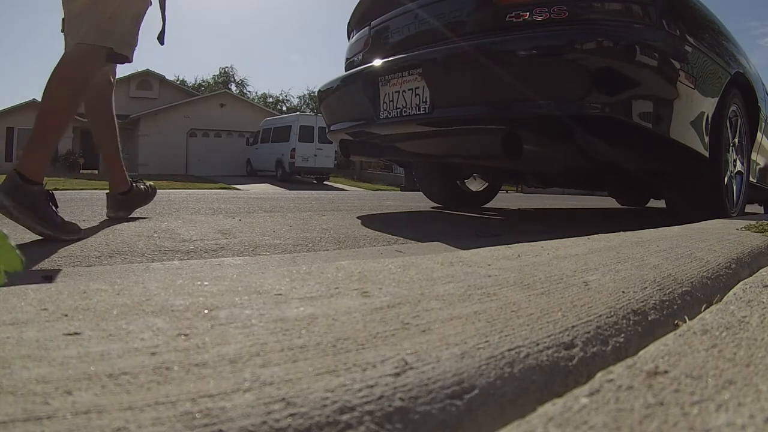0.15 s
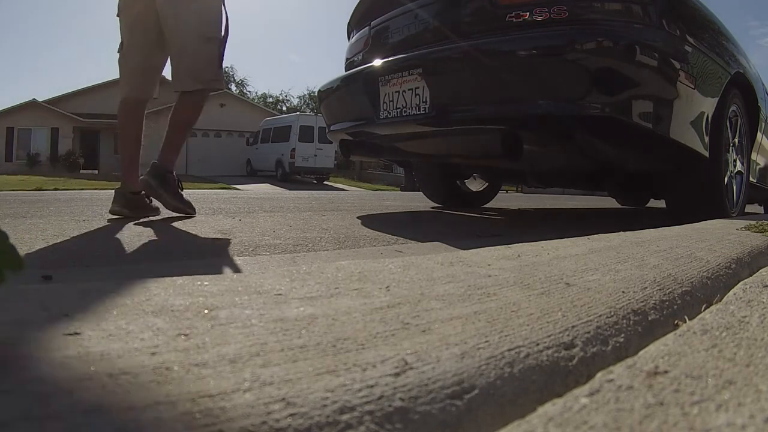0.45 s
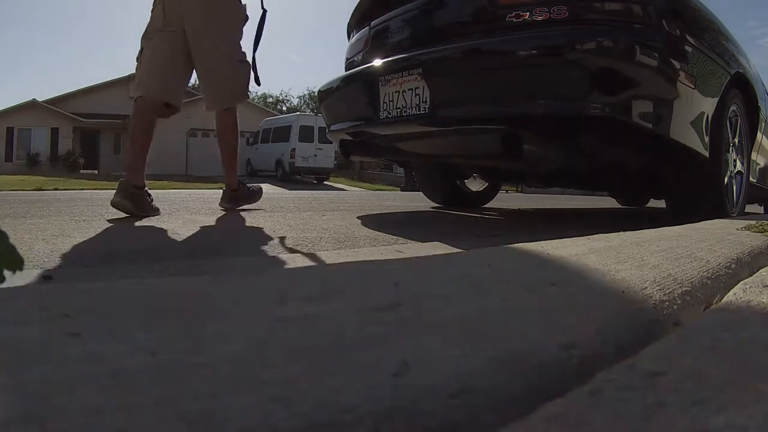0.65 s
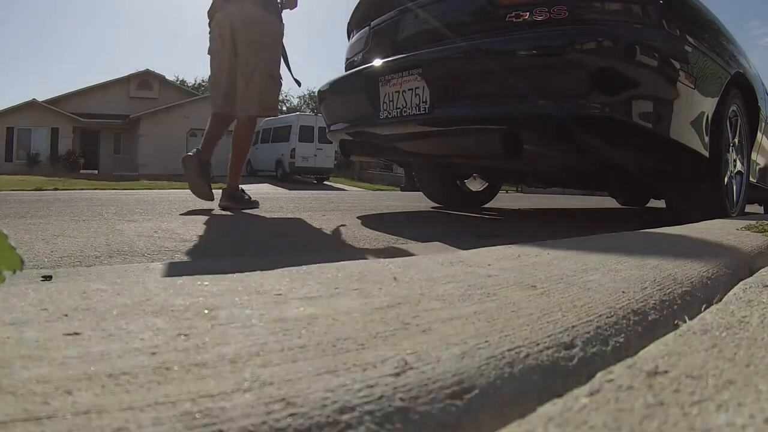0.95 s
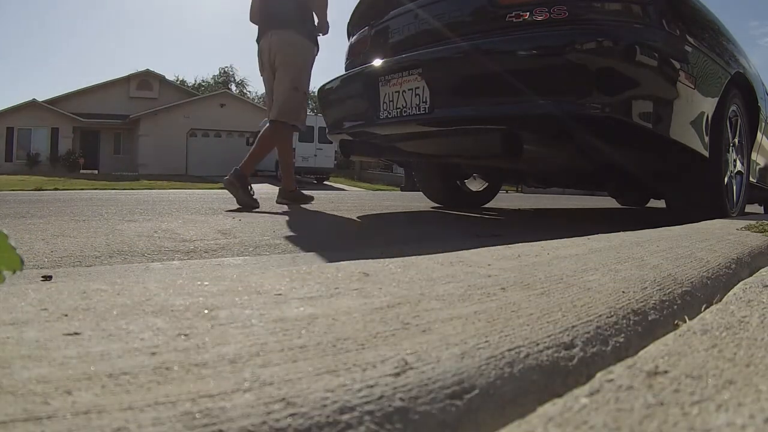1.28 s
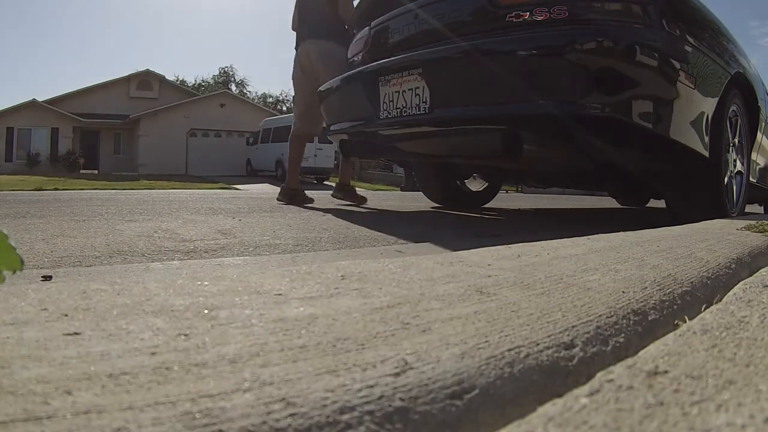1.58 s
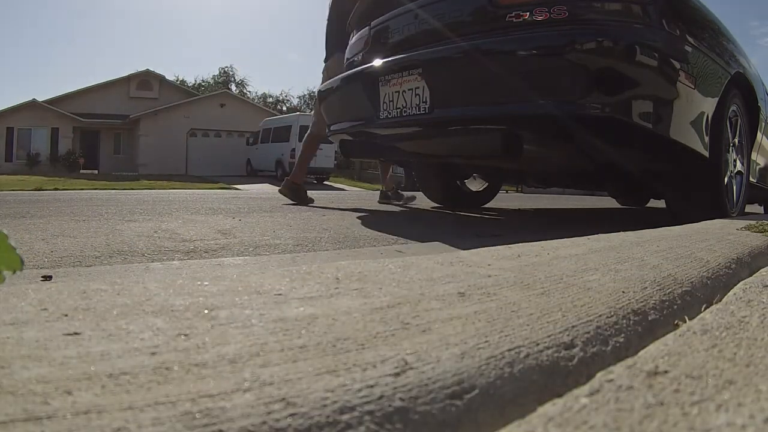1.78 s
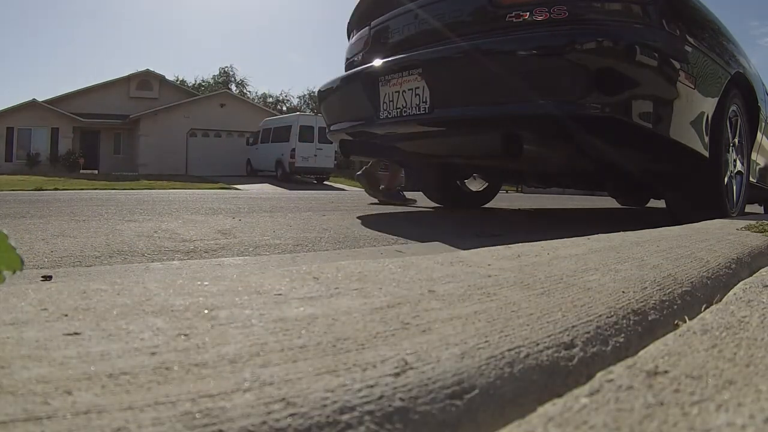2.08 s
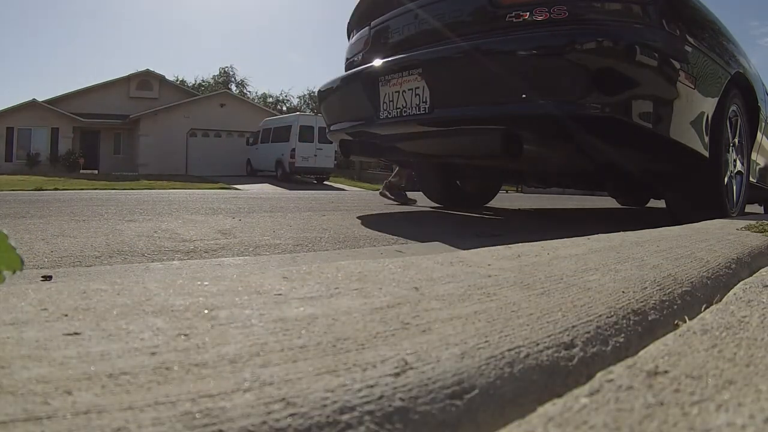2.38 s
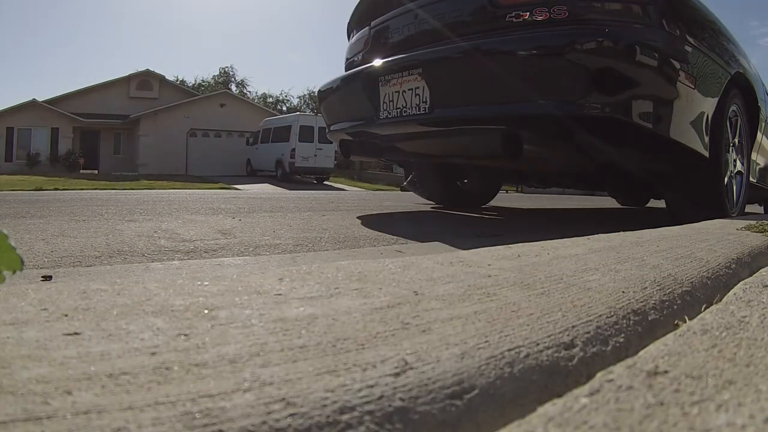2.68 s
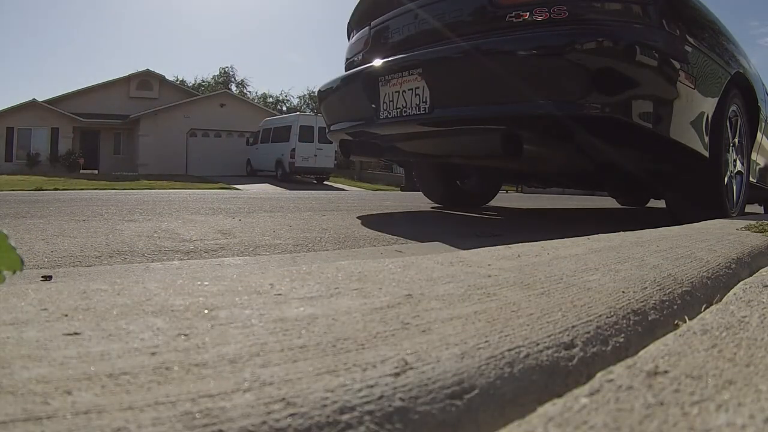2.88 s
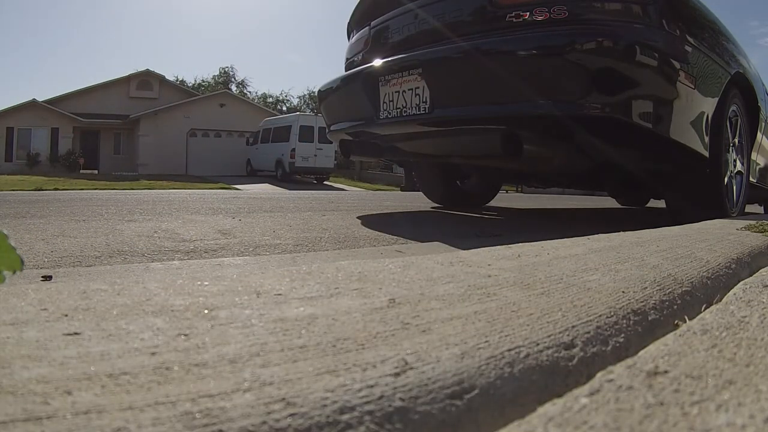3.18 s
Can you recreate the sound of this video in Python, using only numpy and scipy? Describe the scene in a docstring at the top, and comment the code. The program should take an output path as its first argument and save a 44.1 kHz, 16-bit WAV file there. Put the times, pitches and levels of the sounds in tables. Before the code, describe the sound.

Light footsteps in trainers scuff and crackle on a gritty driveway, fading away from a microphone on the ground. A faint bird chirps over a low hum and soft suburban hiss. At the end, a car door clicks and thumps.

```python
"""A suburban driveway, one microphone lying on the ground. Someone in trainers walks off
towards a parked car, soles scuffing and cracking grains of sand. Far off, a small bird repeats
a falling chirp over a machine hum and the soft hiss of the suburb. At the end come light taps,
a latch click and a dull thump, most likely the car's door."""
import sys
import numpy as np
from scipy import signal
from scipy.fft import rfft, irfft
from scipy.io import wavfile

SR = 44100
rng = np.random.default_rng(int(sys.argv[2]) if len(sys.argv) > 2 else 0)


def unload_wav(signal):
    """Save mono or channel-first audio to the path in sys.argv[1] as 16-bit WAV at rate SR, clipped to [-1, 1]."""
    wavfile.write(
        sys.argv[1],
        SR,
        np.round(np.clip(np.atleast_2d(signal).T, -1, 1) * 32767).astype(np.int16),
    )


N = 147294
T = np.arange(N) / SR

# Soles dragging over the driveway: centre_s, width_s, level_db, tilt_db_per_octave
SCUFFS = [(0.01, 0.041, -66, -2.5), (0.22, 0.011, -57.5, 1), (0.269, 0.01, -58, .5),
          (0.307, .03, -68.5, 2.5), (.515, 0.0084, -70, 8), (0.742, 0.0093, -62, -3),
          (0.763, 0.0041, -54.5, -3), (0.789, 0.027, -64, -1.5), (1.334, 0.029, -64, -2),
          (1.87, 0.028, -69, -5), (2.165, .03, -73, 12), (2.528, 0.067, -72.5, -3)]
# Spectrum of the grit: frequency_hz, density_db
GRIT_SPECTRUM = [(700, -23), (1500, 3), (2500, 4.5), (4200, 3.5), (6200, 3.5), (7500, -1.5), (10000, -2.5),
                 (15000, -11)]
def scuffs(grains_per_s=3400, spread_db=4.1):
    """A dragging sole sets off a shower of tiny clicks of uneven size."""
    out = np.zeros(N)
    for s, width_s, db, tilt_db in SCUFFS:
        sizes = from_db(spread_db * np.minimum(rng.exponential(1, N), 4))
        signs = rng.choice([-1, 1], N)
        grains = sizes * signs * (rng.random(N) < grains_per_s / SR)
        out += from_db(db) * swell(s, width_s) * coloured(grains, GRIT_SPECTRUM, tilt_db)
    return out


# Single grains breaking underfoot: start_s, level_db, pitch_hz
CRACKS = [(.0035, -44.5, 7000), (.019, -34.5, 2330), (0.0414, -45, 2400), (.051, -39.5, 2150),
          (0.129, -46, 6500), (0.2206, -37, 6000), (.2632, -41, 6000), (0.277, -34, 5570),
          (.302, -42, 9500), (.334, -42.5, 3000), (.3915, -45.5, 6200), (.7602, -44, 2700),
          (0.765, -39, 2900), (0.7827, -36, 4830), (.7895, -44, 9000), (.810, -40, 6800),
          (1.333, -42, 5000)]
def sand_cracks(ring_cycles=4.4, snap_db=-8.5):
    """Each grain cracks with a bright snap and rings for a few cycles."""
    return sum(from_db(db) * (ring(click(s), hz, ring_cycles / hz) + from_db(snap_db) * click(s))
               for s, db, hz in CRACKS)


# Heels landing: start_s, level_db
HEEL_STRIKES = [(.0365, -46), (0.601, -63), (.973, -43), (1.198, -47), (1.279, -51)]
# Resonances of a heel on the ground: pitch_hz, gain_db, t60_s
HEEL_MODES = [(505, -2.5, 0.028), (630, -7.5, 0.024), (1210, -20, 0.0089)]
def heels():
    """Each heel lands with a soft, quickly damped tap."""
    return struck(HEEL_STRIKES, HEEL_MODES)


def leg_puff():
    """The passing leg pushes air against the microphone."""
    return from_db(-44) * swell(s=.182, width_s=.013) * tone(hz=31.2)


# Knocks of the car door: start_s, level_db, lowpass_hz, rattle_db, rattle_t60_s
DOOR_KNOCKS = [(3.2195, -55.5, 3200, 11.5, 0.11), (3.2425, -34, 1090, -2, .13), (3.256, -42, 700, 0, .13),
               (3.266, -42.5, 900, -4, 0.12), (3.279, -39.5, 190, 0, .14), (3.288, -38, 190, 0, 0.16),
               (3.318, -48.5, 1000, 2, .16)]
# Resonances of its panel: pitch_hz, gain_db, t60_s
PANEL_MODES = [(60, 0, 0.21), (86.2, -2.5, 0.27), (144, -3, 0.28), (171, -0.5, 0.28), (206, 1.5, 0.33),
               (313, 2, 0.25), (404, 1, 0.16), (504, -8.5, 0.22), (638, -4.5, 0.17), (700, -2, 0.14),
               (755, -1.5, 0.27), (858, -7, 0.22), (1060, -5.5, 0.11), (1350, -12.5, 0.059)]
# Spectrum of its fittings: frequency_hz, density_db
RATTLE_SPECTRUM = [(60, 2), (150, 4.5), (300, 2), (750, 1.5), (1000, -10), (2400, -12.5), (3200, -21),
                   (4400, -18), (5500, -23), (12000, -42)]
def door_thump(panel_db=-6.5, detune=.025):
    """Each knock rings the panel at slightly shifted pitches and shakes the fittings."""
    out = np.zeros(N)
    for s, db, lowpass_hz, rattle_db, rattle_t60 in DOOR_KNOCKS:
        panel = np.zeros(N)
        for hz, mode_db, t60 in PANEL_MODES:
            gain = rng.choice([-1, 1]) * from_db(mode_db + rng.normal(0, .95))
            panel += gain * ring(click(s), hz * rng.normal(1, detune), t60)
        rattle = from_db(rattle_db) * burst(s, RATTLE_SPECTRUM, rattle_t60)
        out += from_db(db) * soften(from_db(panel_db) * panel + rattle, lowpass_hz)
    return out


# Swells within the thump: centre_s, width_s, level_db, pitch_hz
DOOR_SWELLS = [(3.245, .005, -35, 310), (3.25, .012, -44, 58), (3.333, .012, -47, 55),
               (3.329, .011, -54, 850)]
def door_flex():
    """The door flexes and its seal and hinge rub, in short swells of tone."""
    return sum(from_db(db) * swell(s, width_s) * tone(hz) for s, width_s, db, hz in DOOR_SWELLS)


# Blows on the latch: start_s, level_db
LATCH_STRIKES = [(3.2205, -62), (3.2465, -53.5), (3.258, -62.5)]
# Resonances of the latch: pitch_hz, gain_db, t60_s
LATCH_MODES = [(1410, -2, 0.087), (2035, 3.5, .09), (2440, -9, 0.035), (2900, -5.5, 0.049),
               (4170, -5.5, 0.062), (4430, -17, 0.066)]
def door_latch():
    """Struck steel rings briefly above the thump."""
    return struck(LATCH_STRIKES, LATCH_MODES)


# Light taps over at the car, probably its handle: start_s, level_db, snap_db
HANDLE_TAPS = [(3.058, -52.5, -1), (3.067, -57.5, -3), (3.161, -56.5, -9)]
# Their hollow resonances: pitch_hz, gain_db, t60_s
HANDLE_MODES = [(261, -2, .2), (427, -2, 0.33), (538, -3.5, 0.069), (695, 2, 0.053), (781, -13, 0.16)]
# Spectrum of the snap: frequency_hz, density_db
SNAP_SPECTRUM = [(400, 9), (800, -2), (1100, -6), (3000, -5), (4000, -22), (12000, -38)]
def door_handle():
    """Each tap is a short snap of noise and a hollow ring."""
    snaps = sum(from_db(db + snap_db) * burst(s, SNAP_SPECTRUM, t60=.084)
                for s, db, snap_db in HANDLE_TAPS)
    return snaps + struck([(s, db) for s, db, _ in HANDLE_TAPS], HANDLE_MODES)


# Chirps, far from the microphone: pitch_peak_s, level_db, hook_accent_db
CHIRPS = [(.203, -67.5, -3), (1.091, -67.5, -5), (2.230, -67, 2), (3.016, -66, -12)]
# One chirp's quick rise and longer fall: offset_from_peak_s, pitch_hz, gain_db
CHIRP_SHAPE = [(-.011, 3300, -8), (0, 3900, 0), (.009, 3330, -3), (.028, 3040, -2), (.046, 2830, -2),
               (.06, 2820, -12)]
# Softer notes after the chirps: start_s, length_s, start_hz, end_hz, level_db
TWEETS = [(.272, .04, 3150, 2780, -65.5), (1.163, .036, 3200, 2820, -66.5), (1.21, .032, 4080, 3900, -72.5),
          (1.278, .032, 2900, 2380, -70.5), (2.303, .04, 3150, 2750, -69.5), (2.462, .03, 3480, 3350, -75),
          (3.093, .03, 3100, 2820, -70)]
def bird(street_db=-3, street_t60_s=.36):
    """A distant bird whistles raspy chirps and tweets; the street adds a diffuse tail."""
    offset_s, hz, shape_db = np.transpose(CHIRP_SHAPE)
    song = np.zeros(N)
    for s, db, hook_db in CHIRPS:
        envelope = np.interp(T - s, offset_s, from_db(shape_db), left=0, right=0)
        gain = from_db(db + hook_db * swell(s, width_s=.007))
        song += gain * envelope * rasp(np.interp(T - s, offset_s, hz))
    for s, length_s, start_hz, end_hz, db in TWEETS:
        progress = np.clip((T - s) / length_s, 0, 1)
        song += from_db(db) * np.sin(np.pi * progress) * rasp(start_hz + (end_hz - start_hz) * progress)
    tail = rng.standard_normal(N) * from_db(-60 * T / street_t60_s)
    reverb = signal.fftconvolve(song, tail / np.linalg.norm(tail))[:N]
    return song + from_db(street_db) * reverb


def rasp(hz, flutter_hz=220, spread_hz=45, depth=.2):
    """The bird's whistle flutters quickly in pitch and loudness."""
    bend, flutter = wobble(flutter_hz), wobble(flutter_hz)
    return rms_one((1 + depth * flutter) * tone(hz + spread_hz * bend))


def ping():
    """One faint, thin, very high ping."""
    return from_db(-73) * swell(s=2.402, width_s=.005) * tone(hz=14450)


# Unevenness of the hum: time_s, depth_ratio
HUM_THROB = [(0, .3), (1.9, .25), (2.4, .08)]
def machine_hum():
    """A machine holds one low note that throbs irregularly."""
    throb = np.interp(T, *np.transpose(HUM_THROB)) * wobble(hz=12)
    return from_db(-54) * (1 + throb) * tone(hz=118.4)


# Drones just above the hum, just below it and higher up: time_s, level_db
UPPER_DRONE = [(0, -53), (.25, -54), (.42, -64), (.65, -54), (.9, -71.5), (2.0, -67), (3.3, -82)]
LOWER_DRONE = [(0, -55), (.45, -70), (.7, -55), (1.2, -66.5), (1.95, -63), (2.2, -68), (3.3, -75)]
HIGH_DRONE = [(0, -70), (.6, -63), (1.2, -67.5), (1.9, -64), (2.4, -68.5), (2.8, -76)]
def drones(wander_hz=1.5):
    """Three wavering tones swell and fade; the two nearest the hum beat against it."""
    return sum(level(points) * tone(hz + wander_hz * wobble(hz=7.4))
               for hz, points in [(128.35, UPPER_DRONE), (105.7, LOWER_DRONE), (211.2, HIGH_DRONE)])


# Ambience around the driveway: frequency_hz, density_db
AIR_SPECTRUM = [(20, -6), (45, -3), (75, 2.5), (95, -3), (140, 0), (190, -5.5), (310, -8.5), (400, -12),
                (700, -15.5), (1000, -18.5), (2000, -23.5), (4000, -28), (6300, -32), (10000, -37),
                (15000, -44)]
# Its slow drift: time_s, level_db
AIR_LEVEL = [(0, -54.5), (.4, -56), (1.5, -57), (3.3, -56.5)]
def suburb_hiss():
    """Smooth outdoor noise, strongest in the bass."""
    return level(AIR_LEVEL) * coloured(rng.standard_normal(N), AIR_SPECTRUM)


def from_db(db):
    """Decibels to gain."""
    return 10 ** (np.asarray(db) / 20)


def rms_one(x):
    """Scale to unit rms."""
    return x / np.sqrt(np.mean(x ** 2) + 1e-20)


def level(points):
    """Gain over time from (time_s, level_db) points."""
    return from_db(np.interp(T, *np.transpose(points)))


def swell(s, width_s):
    """A bell curve centred on s, with standard deviation width_s."""
    return np.exp(-.5 * ((T - s) / width_s) ** 2)


def coloured(x, spectrum, tilt_db=0):
    """Give x a spectrum, tilted per octave and falling away below its first point; rms 1."""
    hz, db = np.transpose(spectrum)
    f = np.maximum(np.fft.rfftfreq(N, 1 / SR), 1)
    gain = from_db(np.interp(np.log(f), np.log(hz), db) + tilt_db * np.log2(f))
    low_cut = np.minimum(f / hz[0], 1) ** 2
    return rms_one(irfft(rfft(x) * gain * low_cut, N))


def burst(s, spectrum, t60):
    """Coloured noise that starts at once and dies away."""
    decay = (T >= s) * from_db(-60 * np.abs(T - s) / t60)
    return decay * coloured(rng.standard_normal(N), spectrum)


def click(s):
    """A unit impulse."""
    return 1.0 * (np.arange(N) == int(s * SR))


def ring(x, hz, t60):
    """A resonator: a unit click starts a decaying sine of height 1."""
    r, w = from_db(-60 / (t60 * SR)), 2 * np.pi * hz / SR
    return signal.lfilter([0, np.sin(w)], [1, -2 * r * np.cos(w), r * r], x + 1e-18)


def struck(strikes, modes):
    """Sharp blows set all of a body's modes ringing."""
    blows = sum(from_db(db) * click(s) for s, db in strikes)
    return sum(from_db(db) * ring(blows, hz, t60) for hz, db, t60 in modes)


def soften(x, hz, order=1):
    """Low-pass."""
    return signal.sosfilt(signal.butter(order, hz, fs=SR, output="sos"), x + 1e-18)


def wobble(hz):
    """Random motion of rms 1, mostly slower than hz."""
    return rms_one(soften(rng.standard_normal(N), hz, order=2))


def tone(hz):
    """A sine of rms 1 that follows a pitch curve."""
    return np.sqrt(2) * np.sin(2 * np.pi * (np.cumsum(hz + 0 * T) / SR + rng.random()))


def scene():
    """Everything at one microphone lying on the driveway."""
    walker = leg_puff() + scuffs() + sand_cracks() + heels()
    car = door_thump() + door_flex() + door_latch() + door_handle()
    background = bird() + ping() + machine_hum() + drones() + suburb_hiss()
    return (walker + car + background)[None]


def record(dry):
    """A steep cut above 15.4 kHz."""
    return signal.sosfilt(signal.ellip(10, .1, 70, 15400, fs=SR, output="sos"), dry)


dry = scene()
out = record(dry)
unload_wav(out)
```